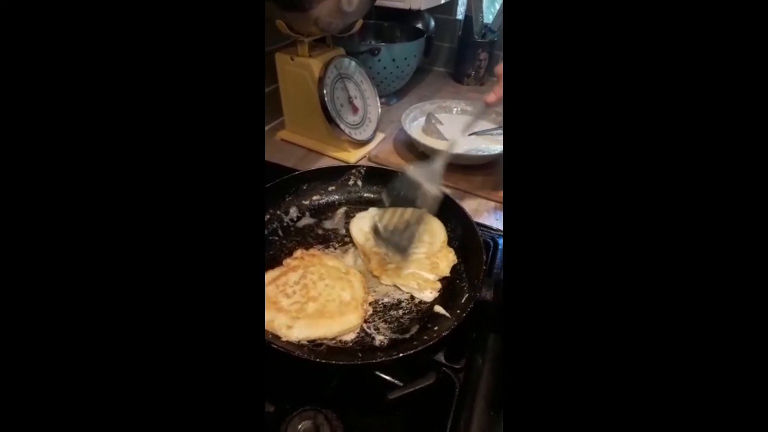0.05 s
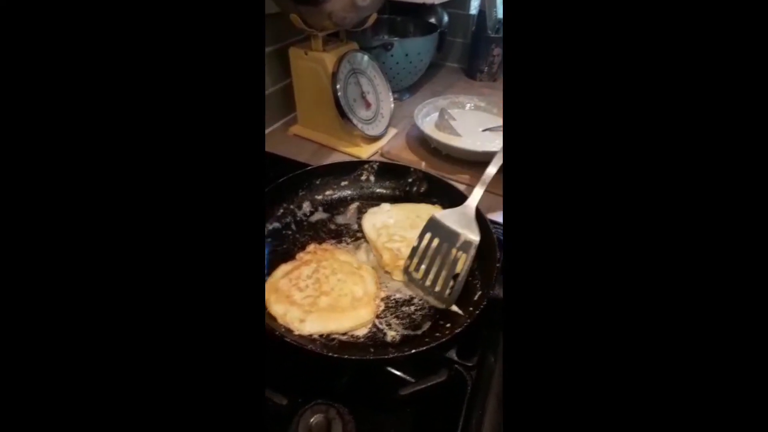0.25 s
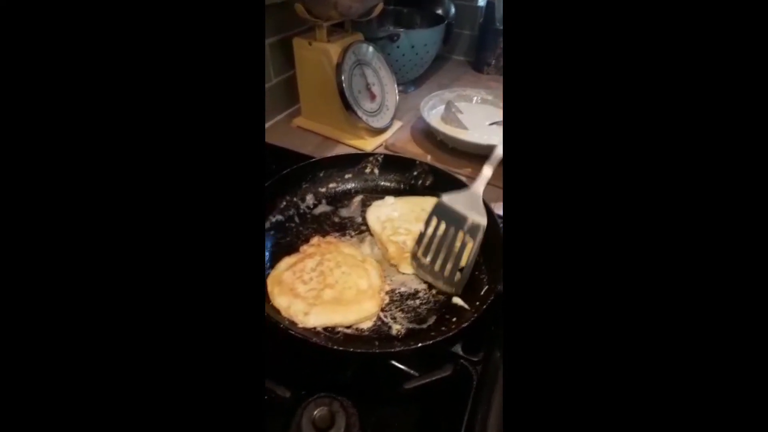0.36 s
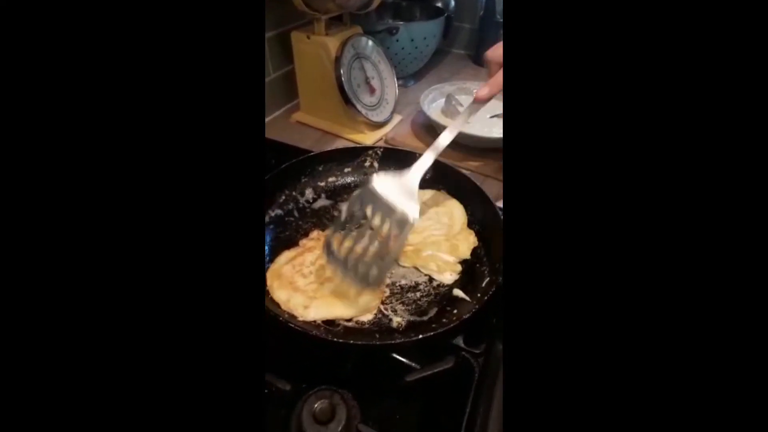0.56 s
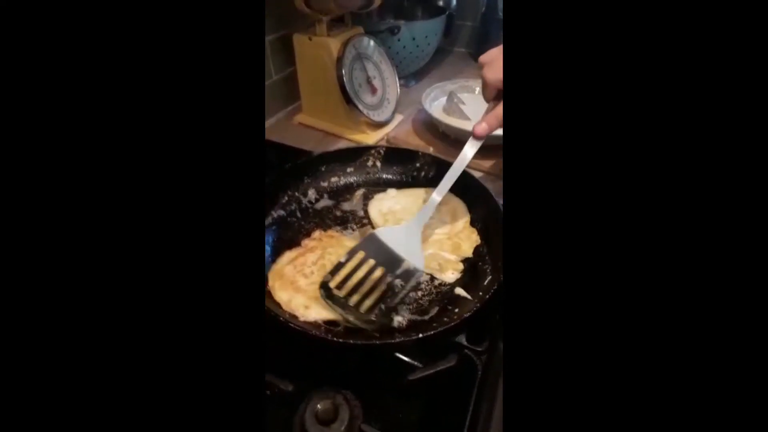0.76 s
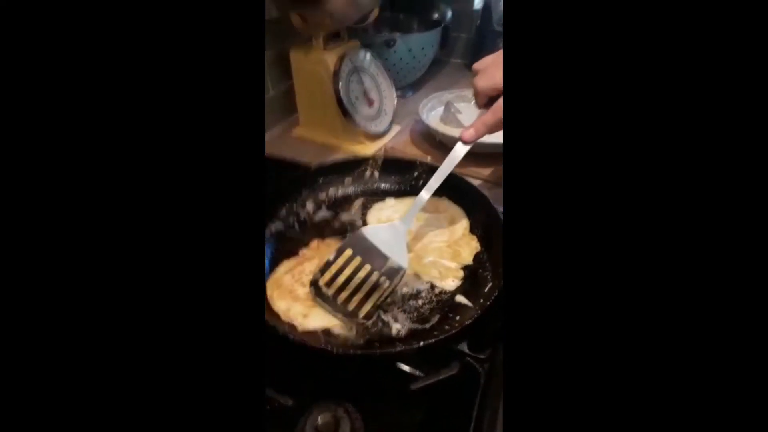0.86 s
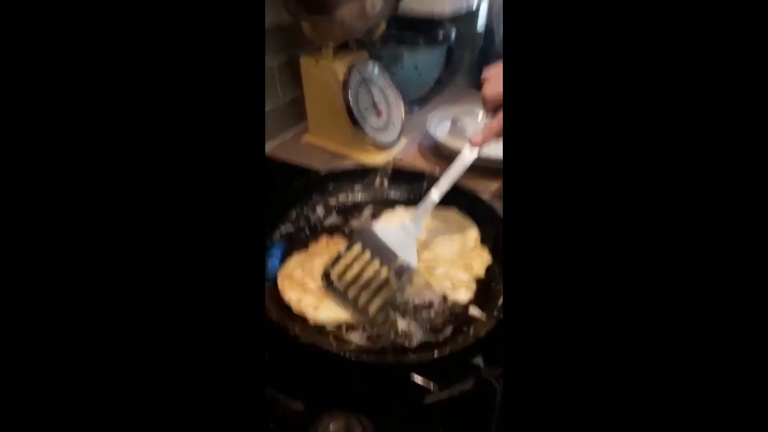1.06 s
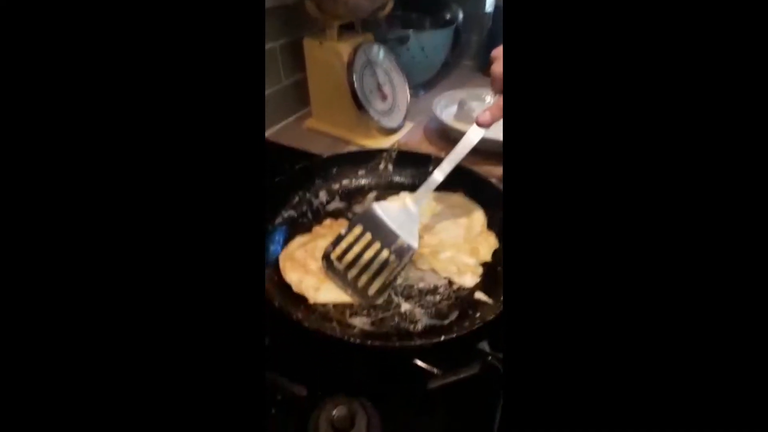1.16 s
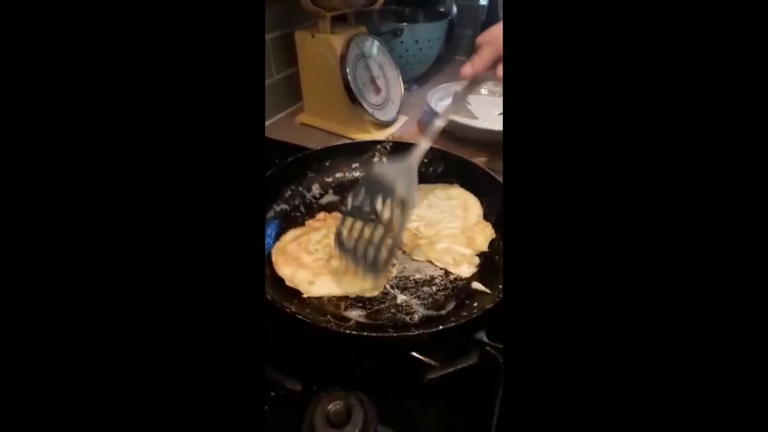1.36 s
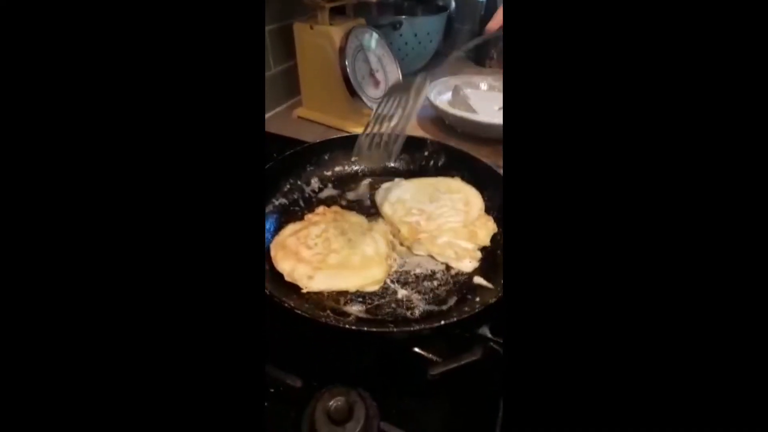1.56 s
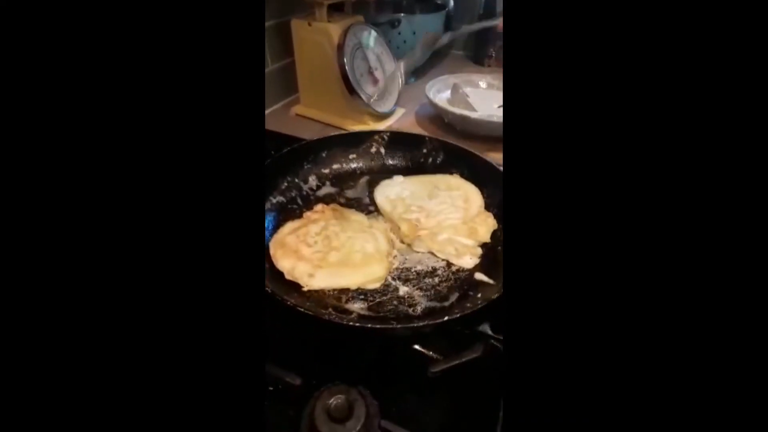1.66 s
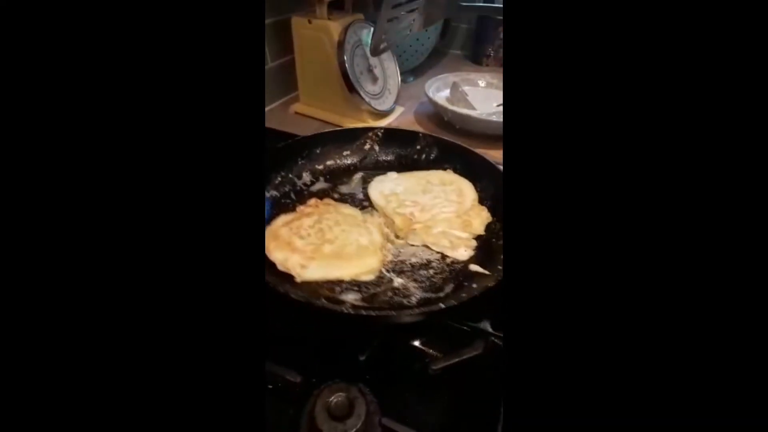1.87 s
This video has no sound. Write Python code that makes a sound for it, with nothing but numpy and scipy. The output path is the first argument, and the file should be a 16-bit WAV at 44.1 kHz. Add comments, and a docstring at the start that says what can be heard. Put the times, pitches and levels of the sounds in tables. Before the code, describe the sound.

Steel spatula clatter: one bright ringing hit on the pan, one duller knock, with soft frying underneath.

```python
"""Pancakes sizzle quietly in a small kitchen, under a thin high whistle: dense noise bursts, filtered noise.
A steel spatula clangs on the pan and chatters, then knocks duller on a pancake: noise bursts and decaying modes.
Fat spits in short bright bursts, the lifting blade ticks, and a faint low bump sounds.
A soft scrape of tiny slips and rubbing noise swells at the end."""
import sys
import numpy as np
from scipy import signal
from scipy.fft import rfft, irfft, next_fast_len
from scipy.io import wavfile

SR = 44100
rng = np.random.default_rng(int(sys.argv[2]) if len(sys.argv) > 2 else 0)


def digitize_waveform(pressure):
    """Quantize a signal to 16-bit integers and store it at the path in sys.argv[1].

    Rows of a 2-D input are taken as channels; values are limited to [-1, 1].
    """
    field = np.atleast_2d(pressure).T
    bounded = np.clip(field, -1, 1)
    quanta = np.round(bounded * 32767).astype(np.int16)
    wavfile.write(sys.argv[1], SR, quanta)


N = 83790
T = np.arange(N) / SR

# Diffuse room echo: f/Hz, t60/s
ROOM_T60_S = [(120, 0.71), (300, 0.43), (800, 0.33), (2200, 0.3), (5000, 0.32), (12000, 0.35)]
ROOM_DELAY_S, ROOM_BUILD_S = 0.002, 0.0051

# Stove and room rumble spectrum: f/Hz, level/dB
RUMBLE_SPECTRUM = [(25, -37.5), (55, -21), (90, -14.5), (130, -3), (175, -14), (245, -4.5), (330, -8),
                   (420, -13), (700, -38)]
# Frying bands: t/s, lows (also rumble) level/dB, middle level/dB, hiss level/dB
FRY_LEVELS = [(0, -57.5, -49.5, -53), (0.21, -57, -48.5, -52.5), (0.5, -65, -54, -59),
              (0.68, -65, -56, -60.5), (0.95, -60.5, -54, -59), (1.15, -63.5, -56, -57.5),
              (1.26, -67.5, -57, -60.5), (1.38, -65, -57, -59.5), (1.46, -64.5, -53.5, -57),
              (1.58, -61, -52.5, -56.5), (1.73, -62, -52.5, -57.5), (1.9, -55, -48, -53.5)]
# Frying spectrum: f/Hz, level/dB
FRY_SPECTRUM = [(240, -34), (400, -14), (700, -5), (1000, -8.5), (1250, -10.5), (1520, -3), (1950, -4.5),
                (2300, -0.5), (2750, -1.5), (3200, -6.5), (3700, -4.5), (4900, -8.5), (5600, -3.5),
                (6600, -7), (8100, -10), (9600, -11.5), (11800, -2), (12800, -8.5), (13600, -11),
                (16000, -9)]
# Narrow resonances kept ringing by the bubbles: f/Hz, width/Hz, gain/dB
FRY_RESONANCES = [(2244, 61, 3), (5370, 140, -6.5)]
LOWS_TOP_HZ, HISS_BOTTOM_HZ = 1580, 8100
BUBBLES_PER_S, BUBBLE_SPREAD_DB = 5000, 0.5
HAZE_GAIN = 0.75  # steam haze relative to bubbles

# Steam whistle: t/s, level/dB
WHISTLE_LEVELS = [(0, -64.5), (1.25, -79), (1.5, -70.5), (1.58, -67), (1.82, -63), (1.9, -64)]
WHISTLE_HZ, WHISTLE_WIDTH_HZ = 12840, 90

# Faint low bump: t/s, level/dB
BUMP_LEVELS = [(1.62, -95), (1.66, -63), (1.71, -64), (1.77, -83)]
# Bump spectrum: f/Hz, level/dB
BUMP_SPECTRUM = [(25, -15), (50, -7), (72, 8), (110, -19), (300, -35)]

# Soft scrape: t/s, level/dB
SCRAPE_LEVELS = [(1.72, -72), (1.80, -55), (1.812, -48), (1.87, -45.5), (1.9, -45)]
# Scrape spectrum: f/Hz, level/dB
SCRAPE_SPECTRUM = [(60, -15.5), (120, 9.5), (230, 1.5), (340, -4), (700, -3.5), (1000, 0), (1400, 4),
                   (1800, -11), (2400, 7), (3500, -11.5), (5800, -9), (9000, -25), (16000, -32)]
# Scrape resonances: f/Hz, width/Hz, gain/dB
SCRAPE_RESONANCES = [(1063, 55, 11.5), (1497, 30, 10.5)]

# Spits of fat: t/s, push level/dB
FAT_SPITS = [(0.339, -65), (0.370, -67), (0.411, -69), (0.927, -89), (1.398, -67.5), (1.451, -71),
             (1.503, -70), (1.667, -65), (1.705, -68)]
# Spit spectrum: f/Hz, relative level/dB
SPIT_SPECTRUM = [(500, -35), (2500, -4), (6000, -5.5), (9000, -6), (12500, 2.5), (16000, 0)]

# Ticks of the lifting blade: t/s, push level/dB, low edge f/Hz, high edge f/Hz
TICK_CONTACTS = [(1.459, -75.5, 497, 5000), (1.503, -71, 504, 5000), (1.5145, -66.5, 490, 4930)]
# Tick overtone spectrum: f/Hz, relative level/dB
TICK_SPECTRUM = [(300, -15), (1500, -27), (2300, 6), (2900, -12), (8000, -21)]

# Blade pressed on the pancake: t/s, push level/dB, low edge f/Hz, high edge f/Hz
KNOCK_CONTACTS = [(0.7103, -25.5, 1850, 15900), (0.7135, -29.5, 120, 8940), (0.7205, -26, 450, 940),
                  (0.743, -45, 202, 2500), (0.769, -42, 395, 2340), (0.778, -35.5, 390, 2310),
                  (0.826, -44.5, 507, 2500), (0.973, -69, 590, 2600), (0.980, -59, 600, 2450)]
# Damped pan modes: f/Hz, relative level/dB, t60/s
DAMPED_MODES = [(125, -7, .45), (250, -13, .6), (562, -7, .25), (598, -1, .27), (729, 1, .38),
                (766, -5, .35), (802, -6, .35), (998, -6, .3), (1066, -1, .3), (1276, -10, .3),
                (1385, -9, .33), (1583, -6, .38), (1660, -8, .36), (2035, -10, .3), (2202, -4, .36),
                (2247, -4, .4), (2320, -4, .25), (2767, -12, .3), (4328, -20, .16), (5230, -17, .22),
                (5420, -18, .2)]
# Knock overtone spectrum: f/Hz, relative level/dB
KNOCK_SPECTRUM = [(50, -37), (110, -10.5), (250, -7), (420, -14), (570, -2), (660, -4.5), (760, 4.5),
                  (900, -5), (1060, -2), (1300, -8.5), (1800, -13), (2350, -2), (2750, -10.5),
                  (3150, -23.5), (3500, -21), (3800, -40.5), (4300, -24.5), (4800, -40), (5350, -23.5),
                  (6200, -39.5), (7200, -37), (7950, -35.5), (8700, -41), (16000, -50.5)]

# Spatula on the bare pan: t/s, push level/dB, low edge f/Hz, high edge f/Hz
CLANG_CONTACTS = [(0.2245, -29.5, 290, 16000), (0.2278, -30.5, 302, 14900), (0.2352, -37.5, 198, 11900),
                  (0.2405, -31, 150, 9340), (0.2478, -36, 80, 14000), (0.259, -50, 80, 9000),
                  (0.289, -40.5, 306, 3550)]
# Clang modes: f/Hz, relative level/dB, t60/s
BARE_MODES = [(138, -12, .5), (838, -2, .27), (880, -7, .25), (1085, -6, .4), (1118, -6, .4),
              (1160, -6, .3), (1568, -3, .28), (1593, -3, .28), (1721, -5, .39), (1760, -2, .39),
              (1810, -4, .28), (2162, -1, .19), (2289, -3, .3), (2450, -2, .2), (2631, 3, .31),
              (2700, -2, .22), (2764, -1, .28), (2809, -1, .3), (2882, -2, .32), (3005, -6, .32),
              (3725, -13, .28), (3887, -9, .22), (4505, -6, .22), (5220, -15, .22), (5940, -13, .2),
              (6368, -12, .18), (6840, -13, .22)]
# Clang overtone spectrum: f/Hz, relative level/dB
CLANG_SPECTRUM = [(50, -43), (100, -22), (135, -4), (200, -20), (330, -19.5), (430, -20), (720, -14),
                  (830, -3.5), (1150, -7.5), (1380, -15.5), (1650, -0.5), (2000, -8.5), (2300, -4.5),
                  (2900, -1), (3250, -22.5), (3780, -12), (4500, -11.5), (5000, -23.5), (6500, -14),
                  (7300, -21), (8100, -34), (10500, -26.5), (16000, -44)]

RECORDER_TOP_HZ = 15900


def amp(db):
    """Decibels to gain."""
    return 10 ** (np.asarray(db) / 20)


def unit(x):
    """Scale to unit energy."""
    return x / np.sqrt(np.sum(x ** 2))


def steady(x):
    """Scale by the standard deviation: unit rms for a zero-mean signal."""
    return x / np.std(x)


def curve(rows, axis=1):
    """Gain over time from a dB column, held beyond its ends."""
    rows = np.array(rows)
    return amp(np.interp(T, rows[:, 0], rows[:, axis]))


def swell(rows):
    """Gain curve, silent before its first point."""
    return curve(rows) * (T > rows[0][0])


def on_log_hz(hz, points):
    """Interpolate (f/Hz, value) points on a log-frequency axis."""
    points = np.array(points)
    return np.interp(np.log(hz + 1), np.log(points[:, 0]), points[:, 1])


def colour(x, spectrum):
    """Causal minimum-phase filter with the given dB response."""
    size = next_fast_len(2 * N, True)
    gain = amp(on_log_hz(np.fft.rfftfreq(size, 1 / SR), spectrum))
    cepstrum = irfft(np.log(gain), size)
    # fold onto positive time
    cepstrum[1:size // 2] *= 2
    cepstrum[size // 2 + 1:] = 0
    response = np.exp(rfft(cepstrum))
    return irfft(rfft(x, size) * response, size)[:N]


def cut(x, hz, kind, order=2):
    """Butterworth low-pass or high-pass."""
    sos = signal.butter(order, min(hz, SR / 2 - 1000), kind, fs=SR, output="sos")
    return signal.sosfilt(sos, x)


def resonate(x, resonances):
    """Sum of narrow resonances driven by x."""
    out = 0
    for hz, width_hz, db in resonances:
        b, a = signal.iirpeak(hz, hz / width_hz, fs=SR)
        out = out + amp(db) * signal.lfilter(b, a, x)
    return out


def fade(t60_s):
    """Exponential decay, -60 dB at t60."""
    return np.exp(-np.log(1000) * T / t60_s)


def play(x, response):
    """Convolve a sound with a response."""
    return signal.fftconvolve(x, response)[:N]


def flat_noise():
    """Random-sign noise: constant magnitude keeps short bursts even in strength."""
    return np.sign(rng.standard_normal(N))


def kitchen():
    """Diffuse room echo: octave bands of noise build quickly, the bass decaying slowest."""
    rest = rng.standard_normal(N)
    out = 0
    for hz in 125 * 2 ** np.arange(8):
        # split off everything left below the band's upper edge
        sos = signal.butter(4, min(hz * np.sqrt(2), 20000), fs=SR, output="sos")
        band = signal.sosfiltfilt(sos, rest)
        rest = rest - band
        out = out + band * fade(on_log_hz(hz, ROOM_T60_S))
    build = np.clip((T - ROOM_DELAY_S) / ROOM_BUILD_S, 0, 1)
    return unit(out * build)


def contact(at_s, db, low_hz, high_hz):
    """One push on the metal; point and softness of contact set its band."""
    push = cut(signal.unit_impulse(N, int(at_s * SR)), high_hz, "low")
    return cut(push, low_hz, "high") * amp(db) * np.sqrt(SR)


def clatter(contacts, spectrum, t60_s, room_db):
    """Each contact excites a short burst of dense overtones, prolonged by the room."""
    bursts = sum(play(contact(*row), unit(flat_noise() * fade(t60_s))) for row in contacts)
    filter_norm = np.linalg.norm(colour(signal.unit_impulse(N), spectrum))
    dry = colour(bursts, spectrum) / filter_norm
    return dry + amp(room_db) * play(dry, kitchen())


def ring(contacts, modes, ring_db):
    """Long metal modes: contacts add energy to modes in their band; the energy leaks away."""
    out = 0
    for hz, db, t60_s in modes:
        energy = 0
        for at_s, push_db, low_hz, high_hz in contacts:
            in_band = 1 / (1 + (hz / high_hz) ** 4) / (1 + (low_hz / hz) ** 4)
            leak = np.exp(-2 * np.log(1000) * np.maximum(T - at_s, 0) / t60_s)
            energy = energy + amp(2 * push_db) * in_band * (T > at_s) * leak
        envelope = cut(np.sqrt(energy), hz / 4, "low")  # softens the onset
        out = out + amp(db) * envelope * np.sin(2 * np.pi * (hz * T + rng.random()))
    return amp(ring_db) * out


def rumble():
    """Low stove and room rumble: filtered noise at unit rms."""
    return steady(colour(rng.standard_normal(N), RUMBLE_SPECTRUM))


def frying():
    """Thousands of tiny bubble bursts per second over a haze of steam, with the stove rumble."""
    sizes = amp(BUBBLE_SPREAD_DB * np.minimum(rng.exponential(size=N), 6))
    bubbles = (rng.random(N) < BUBBLES_PER_S / SR) * sizes * flat_noise()
    haze = HAZE_GAIN * rng.standard_normal(N)
    fry = colour(steady(bubbles) + haze, FRY_SPECTRUM)
    fry = fry + resonate(fry, FRY_RESONANCES)
    lows = steady(cut(fry, LOWS_TOP_HZ, "low", order=5))
    above_lows = cut(fry, LOWS_TOP_HZ, "high", order=5)
    middle = steady(cut(above_lows, HISS_BOTTOM_HZ, "low", order=3))
    hiss = steady(cut(fry, HISS_BOTTOM_HZ, "high", order=3))
    out = (lows + rumble()) * curve(FRY_LEVELS, axis=1)
    out = out + middle * curve(FRY_LEVELS, axis=2)
    return out + hiss * curve(FRY_LEVELS, axis=3)


def steam():
    """Thin whistle, likely steam from under the batter: noise through one narrow resonance."""
    whistle = resonate(rng.standard_normal(N), [(WHISTLE_HZ, WHISTLE_WIDTH_HZ, 0)])
    return steady(whistle) * curve(WHISTLE_LEVELS)


def bump():
    """Faint low bump as the spatula is taken away: a swell of filtered noise."""
    return steady(colour(rng.standard_normal(N), BUMP_SPECTRUM)) * swell(BUMP_LEVELS)


def scrape(slips_per_s=600, rub_gain=1.0):
    """Something slides by the stove: dense little slips over rubbing noise excite resonances."""
    slips = (rng.random(N) < slips_per_s / SR) * rng.standard_normal(N)
    rub = colour(steady(slips) + rub_gain * rng.standard_normal(N), SCRAPE_SPECTRUM)
    return steady(rub + resonate(rub, SCRAPE_RESONANCES)) * swell(SCRAPE_LEVELS)


def spits():
    """Larger fat bubbles burst with a short bright spray of noise."""
    bursts = [(at_s, db, 500, 17000) for at_s, db in FAT_SPITS]
    return clatter(bursts, SPIT_SPECTRUM, t60_s=0.072, room_db=-11)


def ticks():
    """Light ticks of the lifting blade: short overtone bursts only."""
    return clatter(TICK_CONTACTS, TICK_SPECTRUM, t60_s=0.026, room_db=-1.5)


def knock():
    """Blade on the pancake: overtone bursts plus the modes of the damped pan."""
    overtones = clatter(KNOCK_CONTACTS, KNOCK_SPECTRUM, t60_s=0.04, room_db=-8)
    return amp(-7.0) * overtones + ring(KNOCK_CONTACTS, DAMPED_MODES, ring_db=-4.0)


def clang():
    """Spatula on the bare pan: bright overtone bursts plus long modes."""
    overtones = clatter(CLANG_CONTACTS, CLANG_SPECTRUM, t60_s=0.04, room_db=-1)
    return amp(-4.5) * overtones + ring(CLANG_CONTACTS, BARE_MODES, ring_db=2.5)


def scene():
    """All sources at one microphone above the pan."""
    background = frying() + steam() + bump() + scrape() + spits()
    spatula = ticks() + knock() + clang()
    return (background + spatula)[None]


def record(dry):
    """Recorder: clips at full scale, then cuts the top steeply."""
    sos = signal.ellip(10, .2, 80, RECORDER_TOP_HZ, fs=SR, output="sos")
    return signal.sosfilt(sos, np.clip(dry, -1, 1))


dry = scene()
out = record(dry)
digitize_waveform(out)
```